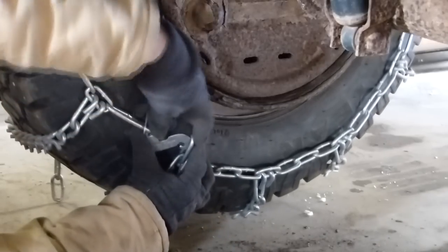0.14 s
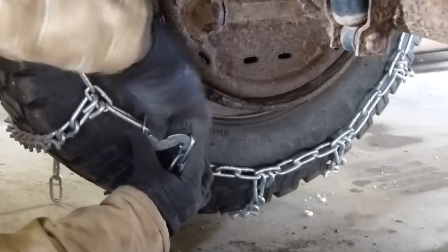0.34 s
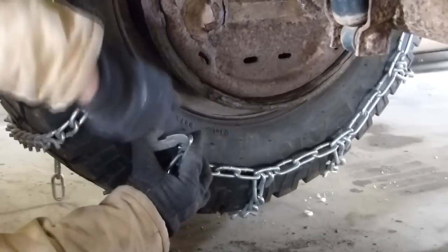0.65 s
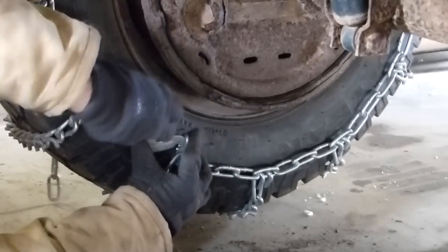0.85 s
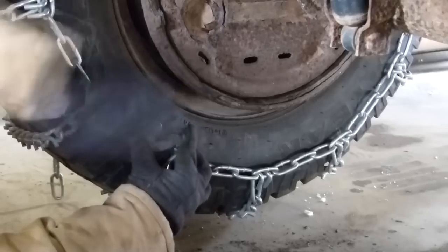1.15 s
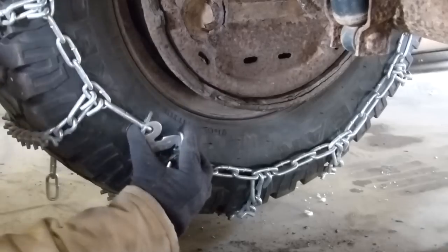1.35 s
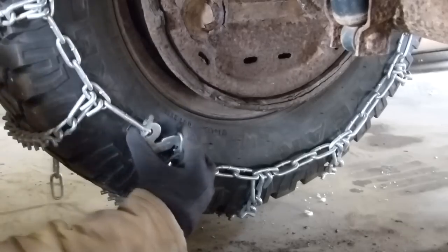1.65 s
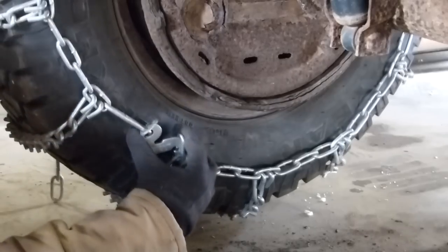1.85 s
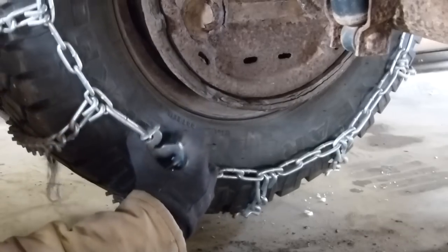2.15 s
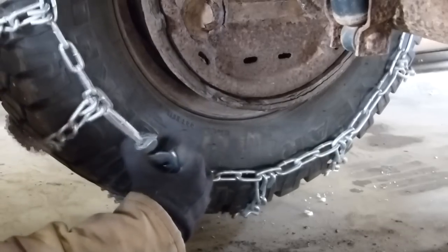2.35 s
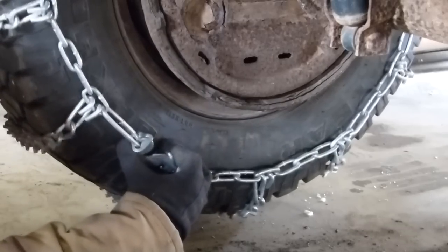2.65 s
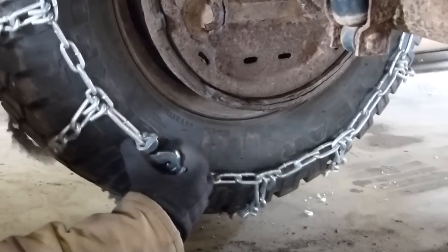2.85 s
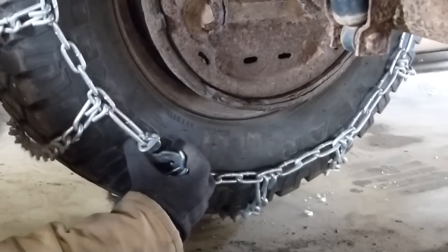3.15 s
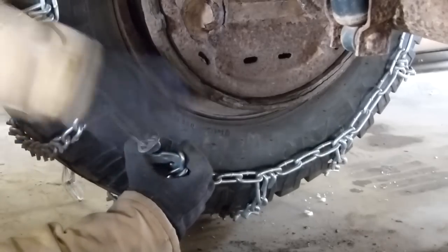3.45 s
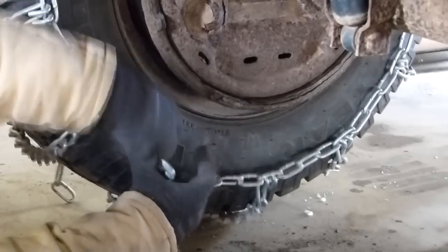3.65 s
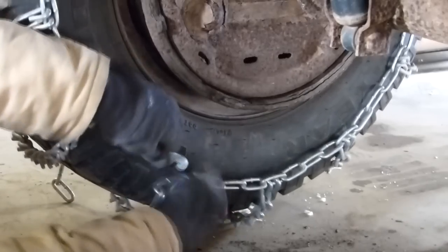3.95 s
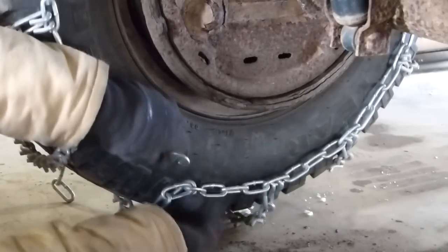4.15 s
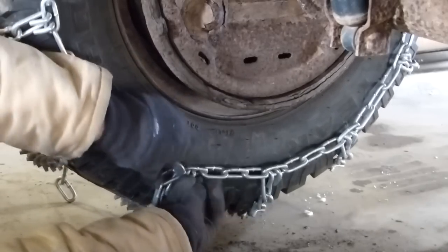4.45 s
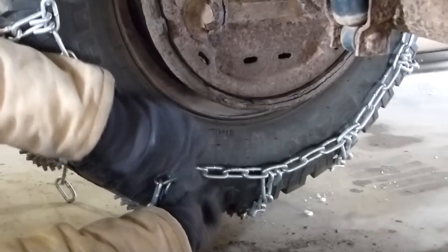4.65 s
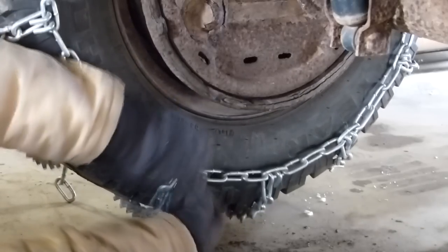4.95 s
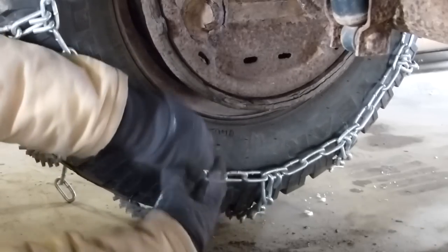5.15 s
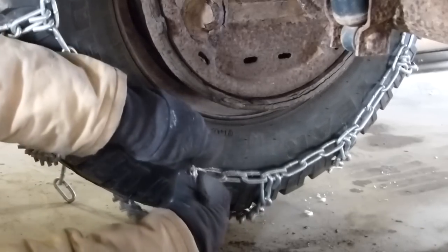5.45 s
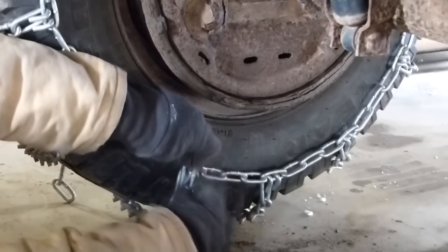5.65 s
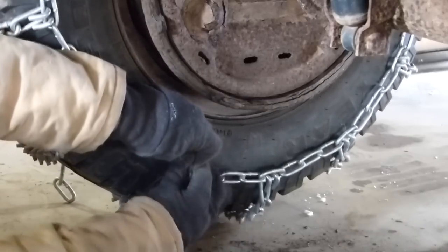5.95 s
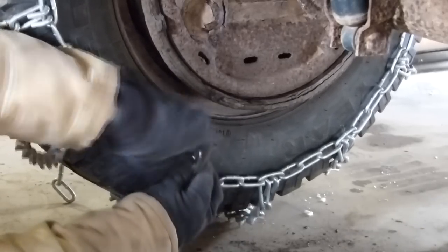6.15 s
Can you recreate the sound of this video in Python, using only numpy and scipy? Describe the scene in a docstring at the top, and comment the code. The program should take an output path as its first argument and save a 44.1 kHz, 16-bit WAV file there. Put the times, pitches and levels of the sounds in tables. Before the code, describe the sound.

Very high, glassy steel chain links clink, chatter and ring in quick clusters, with dull rubber knocks, a short scrape and faint sleeve rustle.

```python
"""Links of a steel snow chain chatter and ring very high as gloved hands hook it around a truck tire.
Each clink is a blow and random contacts driving decaying modes; a heavier, lower hook strikes links too.
Pulled taut and later slack, the chain knocks and slips on the rubber (modes, gliding sines) and scrapes and
rattles over hook and wheel (driven resonances); the rubber rubs with the pull and after each knock.
Sleeves and gloves rustle throughout as filtered contacts and noise, over quiet outdoor air."""
import sys
import numpy as np
from scipy import signal
from scipy.fft import rfft, irfft
from scipy.io import wavfile
from scipy.ndimage import uniform_filter1d

SR = 44100
rng = np.random.default_rng(int(sys.argv[2]) if len(sys.argv) > 2 else 0)


def log_audio(samples):
    """Write samples as a 16-bit WAV file to the path given in sys.argv[1]."""
    # one column per channel
    frames = np.atleast_2d(samples).T
    # limit to full scale, then quantise
    limited = np.clip(frames, -1, 1)
    pcm = np.round(limited * 32767).astype(np.int16)
    wavfile.write(sys.argv[1], SR, pcm)


N = 277830
T = np.arange(N) / SR
TOP_HZ = 16000


def undb(db):
    """Decibels to gain."""
    return 10 ** (np.asarray(db) / 20)


def unit(x):
    """Scale to rms 1."""
    return x / np.sqrt(np.mean(x ** 2) + 1e-24)


def crest(x, size=176):
    """Scale so that the loudest few milliseconds have rms 1."""
    return x / np.sqrt(uniform_filter1d(x ** 2, size).max() + 1e-24)


def add(out, start_s, x):
    """Mix x in at start_s."""
    i = max(int(start_s * SR), 0)
    out[i:i + len(x)] += x[:max(N - i, 0)]


def cut(x, hz, kind, order):
    """Butterworth high-pass or low-pass."""
    return signal.sosfilt(signal.butter(order, hz, kind, fs=SR, output="sos"), x)


def colour(x, points, size=2048):
    """Causal minimum-phase filter with the given spectrum, by folding the cepstrum."""
    hz, db = np.transpose(points)
    f = np.maximum(np.fft.rfftfreq(size, 1 / SR), 1)
    log_gain = np.log(undb(np.interp(np.log(f), np.log(hz), db)))
    cepstrum = irfft(log_gain)
    cepstrum[1:size // 2] *= 2
    cepstrum[size // 2 + 1:] = 0
    response = irfft(np.exp(rfft(cepstrum)))
    return signal.oaconvolve(x, response)[:len(x)]


def ring(x, hz, t60):
    """One decaying mode driven by x: a two-pole resonator."""
    radius = np.exp(-np.log(1000) / (t60 * SR))
    w = 2 * np.pi * hz / SR
    return signal.lfilter([.5, 0, -.5], [1, -2 * radius * np.cos(w), radius * radius], x)


def resonate(x, modes):
    """A body with the given resonances, driven by x."""
    return sum(undb(db) * width_hz * ring(x, hz, np.log(1000) / (np.pi * width_hz))
               for hz, width_hz, db in modes)


def contacts(size, per_s, spread_db):
    """Random tiny impacts of uneven strength and either sign."""
    strength = undb(spread_db * np.minimum(rng.standard_normal(size), 2))
    return (rng.random(size) < per_s / SR) * strength * rng.choice([-1, 1], size)


def strokes(rows):
    """Gain over time of movements that each swell evenly and then die away."""
    gain = np.zeros(N)
    for start_s, db, swell_s, decay_s in rows:
        age = T[:int((swell_s + 12 * decay_s) * SR)]
        rise = np.minimum(age / swell_s, 1)
        fall = np.exp(-np.maximum(age - swell_s, 0) / decay_s)
        add(gain, start_s, undb(db) * rise * fall)
    return gain


def walk(per_s):
    """Smooth random drift with rms 1."""
    k = int(SR / per_s)
    steps = np.repeat(rng.standard_normal(N // k + 1), k)
    return unit(uniform_filter1d(steps, k)[:N])


def glide(hz):
    """Sine that follows a changing pitch."""
    return np.sin(2 * np.pi * np.cumsum(hz) / SR)


def room(x, wet_db, t60, size=22000):
    """Wheel well and floor give a short diffuse tail."""
    t = np.arange(size) / SR
    tail = rng.standard_normal(size) * undb(-60 * t / t60) * (t > .004)
    return x + undb(wet_db) * signal.oaconvolve(x, unit(tail) / np.sqrt(size))[:N]


# Hollow of the wheel. Each row: pitch in Hz, lift in dB.
WHEEL_HOLLOW = [(346, 3), (406, 4), (520, 2.5), (678, 4), (871, 2), (923, 3), (1026, 4), (1116, 6)]
WELL_T60_S = 0.13


def well(x):
    """The hollow of the wheel lifts its own pitches and lets them ring on."""
    norm = 2 * np.log(1000) / (WELL_T60_S * SR)
    return x + sum((undb(db) - 1) * norm * ring(x, hz, WELL_T60_S) for hz, db in WHEEL_HOLLOW)


def ports(x, side_db, top_hz, size=1024):
    """Nearby reflections reach the two microphone ports slightly differently."""
    side = undb(side_db) * signal.oaconvolve(x, rng.standard_normal(size) / np.sqrt(size))[:N]
    side = cut(side, top_hz, "low", order=1)
    return np.array([x + side, x - side])


# Spectrum of outdoor air. Each row: frequency in Hz, relative level in dB.
AIR_SPECTRUM = [(15, -38), (25, -6), (439, -5.5), (659, 0.5), (754, -1.5), (1400, -7.5), (2550, -8.5),
                (3800, -16.5), (8590, -10), (13200, -16.5), (16000, -36)]
AIR_DB, AIR_SIDE_DB = -62, -17


def outdoor_air():
    """Quiet air: coloured noise in the wheel's hollow, with a low-passed difference between the ports."""
    middle, side = (undb(AIR_DB) * unit(well(colour(rng.standard_normal(N), AIR_SPECTRUM)))
                    for _ in range(2))
    side = cut(side, 1500, "low", order=1)
    return middle + undb(AIR_SIDE_DB) * np.array([side, -side])


# Arm movements. Each row: start in seconds, relative level in dB, swell in seconds, decay in seconds.
ARM_REACHES = [(0.35, -62.5, 0.17, 0.22), (1.2, -56.5, 0.32, 0.13), (1.56, -50.5, 0.11, 0.16),
               (1.77, -61.5, 0.096, 0.4), (2.2, -52.5, 0.23, 1), (2.6, -49, 0.099, 0.54),
               (3.0, -34, 0.12, 0.024), (3.69, -49.5, 0.037, 0.025), (3.9, -51.5, 0.22, 0.066),
               (4.32, -46, 0.2, 0.018), (4.98, -41, 0.13, 0.07), (5.8, -51.5, 0.25, 0.06),
               (6.15, -49.5, 0.065, 0.061)]
# Gloves scuffing on the chain. Each row: start in seconds, relative level in dB, body over swish in dB.
GLOVE_SCUFFS = [(0.0346, -60.5, 9.5), (0.175, -55.5, -2), (0.2022, -64.5, 13), (0.6361, -63, 8.5),
                (0.8367, -67, 15), (0.918, -64.5, 9.5), (1.035, -56, -2), (2.141, -40, -30),
                (3.105, -36, -10.5), (3.168, -36.5, -12), (3.707, -42.5, -27), (4.455, -46.5, -32),
                (4.897, -51, -19)]
# Spectra of fibre swish, cloth body, scuff body. Each row: frequency in Hz, relative level in dB.
SWISH_SPECTRUM = [(1200, -5), (2500, -2.5), (4800, 3.5), (7000, -0.5), (9500, 1.5), (12500, -6.5),
                  (16000, -3)]
CLOTH_SPECTRUM = [(100, -27.5), (300, -18), (480, -0.5), (640, 10), (850, -8.5), (1400, 4.5), (2200, -0.5),
                  (4000, -44)]
SCUFF_SPECTRUM = [(300, -26), (700, -8), (900, 0.5), (1300, -6), (3000, -17.5)]
REST_DB = -64.5  # between movements, before swish_db and body_db
FLUTTER_DB, FLUTTER_PER_S = 3.25, 16  # folds of cloth catch unevenly


def cloth(swish_db, body_db, scuff_db, size=5000):
    """Fibres catch and slip as the arms move; the gloves scuff now and then."""
    swish = unit(colour(contacts(N, per_s=7000, spread_db=2.5), SWISH_SPECTRUM))
    body = unit(colour(rng.standard_normal(N), CLOTH_SPECTRUM))
    motion = (undb(REST_DB) + strokes(ARM_REACHES)) * undb(FLUTTER_DB * walk(FLUTTER_PER_S))
    out = motion * (undb(swish_db) * swish + undb(body_db) * body)
    t = np.arange(size) / SR
    envelope = np.minimum(t / 0.0012, 1) * np.exp(-t / 0.023)
    for start_s, db, low_db in GLOVE_SCUFFS:
        slip = contacts(size, per_s=2900, spread_db=2.0) * envelope
        high = crest(colour(slip, SWISH_SPECTRUM))
        low = crest(colour(slip, SCUFF_SPECTRUM))
        add(out, start_s, undb(db + scuff_db) * (high + undb(low_db) * low))
    return out


PULL_S, LET_GO_S, RELAX_S = 1.35, 3.19, 0.0046  # one long pull: start, release, decay of rubbing


def tension(s):
    """Share of the full pull reached by time s; it stays at 1 after LET_GO_S."""
    return np.clip((s - PULL_S) / (LET_GO_S - PULL_S), 0, 1)


# Soft bumps of the tire. Each row: start in seconds, relative level in dB.
TIRE_BUMPS = [(1.799, -51), (2.336, -54), (2.618, -49), (2.877, -46.5)]
# Spectrum of rubbed rubber. Each row: frequency in Hz, relative level in dB.
RUBBER_SPECTRUM = [(70, -19), (160, -2), (270, -3.5), (400, -5), (600, 2), (1030, -10), (2000, -21.5),
                   (4400, -23.5)]
TIRE_AIR_HZ, TIRE_AIR_T60_S = 173, .6
RUB_START_DB, RUB_FULL_DB = -69.5, -38
DRAG_DB, DRAG_SWELL_S, DRAG_DECAY_S = -25.5, 0.012, 0.057  # drag after a knock, relative to its row


def tire(air_db, thud_db, size=30000):
    """Rubber rubs with the pull and after each knock; bumps ring the air inside the tire."""
    held = (T > PULL_S) * np.exp(-np.maximum(T - LET_GO_S, 0) / RELAX_S)
    rub = held * undb(RUB_START_DB + (RUB_FULL_DB - RUB_START_DB) * tension(T))
    rub += strokes([(s, db + DRAG_DB, DRAG_SWELL_S, DRAG_DECAY_S) for s, db, _ in TIRE_KNOCKS])
    out = rub * unit(colour(contacts(N, per_s=900, spread_db=3.0), RUBBER_SPECTRUM))
    t = np.arange(size) / SR
    for start_s, db in TIRE_BUMPS:
        push = rng.standard_normal(size) * t * np.exp(-t / .01)
        air = undb(air_db) * crest(ring(push, TIRE_AIR_HZ, TIRE_AIR_T60_S))
        thud = undb(thud_db) * crest(colour(push, RUBBER_SPECTRUM))
        add(out, start_s, undb(db) * (air + thud))
    return out


# Links slipping over rubber. Each row: start in seconds, relative level in dB, decay in seconds,
# first pitch in Hz.
LINK_SLIPS = [(2.491, -41, 0.0063, 675), (2.621, -25, 0.0033, 666), (2.678, -21, 0.0062, 689),
              (2.880, -20.5, 0.017, 709), (3.117, -19.5, 0.0056, 740), (4.508, -34.5, 0.0026, 790),
              (4.521, -27, 0.0052, 680)]
SLIP_SWELL_S, GRIP_S, GRIP_HZ = 0.004, 0.018, 447  # GRIP_HZ: pitch of a gripping link


def slips(rough, waver_hz):
    """A link jumps over the rubber: a short, rough, hollow grunt whose pitch falls as it grips again."""
    out = np.zeros(N)
    for start_s, db, decay_s, start_hz in LINK_SLIPS:
        fall = np.exp(-np.maximum(T - start_s, 0) / GRIP_S)
        hz = GRIP_HZ + (start_hz - GRIP_HZ) * fall + waver_hz * walk(400)
        gain = strokes([(start_s, db, SLIP_SWELL_S, decay_s)])
        out += gain * (1 + rough * walk(400)) * glide(hz)
    return room(out, wet_db=-12, t60=0.29)


# Chain knocking on the tire. Each row: start in seconds, relative level in dB,
# relative level of the upper modes in dB.
TIRE_KNOCKS = [(2.148, -45, -12), (2.345, -30, -2.5), (2.692, -27.5, -0.5), (2.883, -27, -9),
               (2.935, -21.5, 6), (3.184, -23.5, 11), (3.204, -31.5, 1), (3.79, -50, -1),
               (4.488, -42, -26.5), (4.531, -44, -23), (5.601, -43, -3)]
# Modes of the tire. Each row: nominal pitch in Hz, relative level in dB, t60 in seconds.
TIRE_BODY = [(205, -18, .1), (350, -16, .07), (520, -7, .06), (650, -2, .025), (790, -7, .05),
             (880, -2, .035), (1115, -8, .045), (1335, 0, .028)]


def knocks(gain_db, upper_db, bass_db, push_s, judder_db, size=12000):
    """Rubber cushions each blow; harder ones reach the upper modes, and the chain judders as it settles."""
    out, t = np.zeros(N), np.arange(size) / SR
    cushion = 1 - np.exp(-(t / push_s) ** 2)
    for start_s, db, hard_db in TIRE_KNOCKS:
        force = undb(judder_db) * contacts(size, per_s=520, spread_db=5.0) * np.exp(-t / 0.014)
        force[0] += 1
        body = 0
        for hz, mode_db, t60 in TIRE_BODY:
            level_db = mode_db + (hard_db + upper_db) * (hz > 835) + bass_db * (hz < 400)
            body = body + undb(level_db) * ring(force, hz * (1 + 0.035 * rng.standard_normal()), t60)
        add(out, start_s, undb(db + gain_db) * crest(body * cushion))
    return cut(out, 2350, "low", order=2)


# Chain dragging over hook and wheel. Each row: start in seconds, relative level in dB,
# swell in seconds, decay in seconds.
CHAIN_SCRAPES = [(1.61, -56, 0.06, 0.046), (2.727, -34.5, 0.025, 0.056), (2.983, -21.5, 0.024, 0.045),
                 (4.99, -49, 0.026, 0.097)]
# Resonances of scraped hook and wheel. Each row: pitch in Hz, width in Hz, relative level in dB.
SCRAPE_BODY = [(800, 110, 3), (872, 90, 4), (1115, 200, -3), (1600, 120, 1), (1797, 60, 7), (1935, 90, 0),
               (2304, 130, 2), (2638, 90, 1), (2950, 500, -5)]
SQUEAL_HZ, SQUEAL_SAG_PER_S, SQUEAL_WANDER_HZ = 946, 2.1, 32.7  # first pitch, relative fall, unsteadiness


def scrapes(gain_db, squeal_db, top_hz):
    """Stick-slip of steel on steel rings the hook and wheel; its rubbing pitch sags as each drag slows."""
    body = resonate(contacts(N, per_s=1000, spread_db=2.5), SCRAPE_BODY)
    out = strokes(CHAIN_SCRAPES) * unit(cut(body, top_hz, "low", order=2))
    for row in CHAIN_SCRAPES:
        sag = np.exp(-SQUEAL_SAG_PER_S * np.maximum(T - row[0], 0))
        hz = SQUEAL_HZ * sag + SQUEAL_WANDER_HZ * walk(300)
        out += undb(squeal_db) * strokes([row]) * (1 + .5 * walk(120)) * glide(hz)
    return undb(gain_db) * out


# Links rattling over the hook. Each row: start in seconds, relative level in dB,
# swell in seconds, decay in seconds.
LINK_RATTLES = [(2.732, -37.5, 0.0099, 0.018), (2.998, -36, 0.016, 0.042), (4.995, -43, 0.0072, 0.081),
                (5.08, -40, 0.0063, 0.047)]
# Resonances of the rattling links. Each row: pitch in Hz, width in Hz, relative level in dB.
RATTLE_BODY = [(2165, 25, 0), (3630, 35, 4), (3980, 130, -2), (4810, 90, 1), (5280, 50, 2), (6880, 55, -1)]


def rattles(gain_db):
    """Separate small contacts ring the links as they run over the hook."""
    body = resonate(contacts(N, per_s=220, spread_db=1.0), RATTLE_BODY)
    return undb(gain_db) * strokes(LINK_RATTLES) * unit(body)


# Spectrum of a steel click. Each row: frequency in Hz, relative level in dB.
CRACK_SPECTRUM = [(100, -23), (300, -11.5), (1500, -11), (2800, -12), (4000, -3.5), (6500, -2), (8500, 3),
                  (11000, 1), (16000, -5)]
BITE_S = 0.000824


def crack(force):
    """The click of the contacts; rough steel takes BITE_S to bite and grates for a moment after."""
    t = np.arange(len(force)) / SR
    grating = undb(-20.0) * rng.standard_normal(len(t)) * np.exp(-t / 0.018)
    bite = 1 - np.exp(-t / BITE_S)
    click = bite * cut(colour(force + grating, CRACK_SPECTRUM), 13500, "low", order=2)
    return crest(cut(click, 180, "high", order=2))


# Hook meeting a link. Each row: start in seconds, relative ring level in dB, crack over ring in dB,
# pitch that the struck spot favours in Hz.
HOOK_STRIKES = [(0.074, -48, 0.5, 5400), (2.493, -41, 5, 8300), (3.735, -35.5, -6, 4560),
                (3.787, -36.5, -7, 4540), (5.587, -31.5, -15.5, 8200), (5.709, -23, -11, 8200),
                (6.166, -27.5, -7, 9800), (6.187, -40, -5, 8720), (6.231, -41.5, -8, 4060),
                (6.286, -18, -29, 9540), (6.288, -32.5, -12, 3880)]
# Modes of the hook. Each row: pitch in Hz, relative level in dB, t60 in seconds before limit and scale.
HOOK_BODY = [(3690, -4, .3), (3835, -6, .09), (4230, -7, .4), (5045, -6, .06), (5400, -6, .05),
             (6350, -7, .04), (7350, -9, .14), (8200, 0, .14), (8410, -3, .11), (10290, 1, .17),
             (11600, -6, .11), (14040, -1, .09)]
HOOK_FREE_S, HELD_T60_S = 6.2, 0.12  # the glove holds the hook until then; t60 limit while held, before scale


def hook(focus_octaves, t60_scale, size=16000):
    """The heavier hook rings lower; the spot that is struck decides which modes lead."""
    out, t = np.zeros(N), np.arange(size) / SR
    for start_s, db, click_db, spot_hz in HOOK_STRIKES:
        force = .5 * contacts(size, per_s=1500, spread_db=4) * np.exp(-t / .004)
        force[0] += 1
        tone = 0
        for hz, mode_db, t60 in HOOK_BODY:
            t60 = t60 if start_s > HOOK_FREE_S else min(t60, HELD_T60_S)
            reach = 1 / (1 + (np.log2(hz / spot_hz) / focus_octaves) ** 2)
            # the link that it meets answers briefly, a little off pitch
            link = crest(ring(force, hz * (1 + .015 * rng.standard_normal()), .03))
            tone = tone + undb(mode_db) * reach * (crest(ring(force, hz, t60 * t60_scale)) + link)
        add(out, start_s, undb(db) * (crest(tone) + undb(click_db) * crack(force)))
    return out


BUILD_T60_S = 0.0013


def sing(x, hz, t60):
    """A mode of a link, which takes an instant to build up."""
    return ring(ring(x, hz, t60), hz, BUILD_T60_S)


# Chain swinging, links jingling on. Each row: start in seconds, relative level in dB,
# swell in seconds, decay in seconds.
CHAIN_SWINGS = [(2.94, -22.5, 0.017, 0.11), (3.19, -22.5, 0.1, 0.053), (3.55, -22, 0.025, 0.063),
                (3.85, -22, 0.17, 0.02), (5.0, -23, 0.051, 0.05), (5.79, -14.5, 0.065, 0.036)]
# Modes of taut and slack links. Each row: nominal pitch in Hz, relative level in dB, nominal t60 in seconds.
TAUT_LINK = [(11260, 0, .16), (11350, -2, .08), (12160, -2, .16), (13025, -9, .14)]
SLACK_LINK = [(11250, -5, .24), (11478, 0, .22), (12622, -7, .26), (13712, -14, .24)]
SLACK_S = 3.70
TAUT_SPREAD, SLACK_SPREAD = 0.0041, 0.00082  # relative difference in pitch between links
STIR_DB, STIR_S, SETTLE_S = -21, 0.0219, 0.038  # a clink stirs its neighbours: relative level, swell, decay


def jostle(ring_db, uneven_db, count=3):
    """Swings and clinks keep a few links singing, mode by mode; the pitches change at SLACK_S."""
    slack = np.clip((T - SLACK_S) / .05, 0, 1)
    out = 0
    # links under tension are damped and pulled further apart in pitch
    for modes, share, spread in (TAUT_LINK, 1 - slack, TAUT_SPREAD), (SLACK_LINK, slack, SLACK_SPREAD):
        links = 0
        for hz, db, t60 in modes:
            for offset in np.linspace(-spread, spread, count):
                level = undb(db + uneven_db * walk(25))
                force = contacts(N, per_s=150, spread_db=3.5)
                links = links + level * unit(sing(force, hz * (1 + offset), t60))
        out = out + share * unit(links)
    stirred = [(s, db + STIR_DB, STIR_S, SETTLE_S) for s, db, _, _ in LINK_CLINKS]
    return undb(ring_db) * out * (strokes(CHAIN_SWINGS) + strokes(stirred))


# Links striking each other. Each row: start in seconds, relative level in dB,
# relative crack level in dB (also sets hardness), chatter decay in seconds.
LINK_CLINKS = [(2.059, -25.5, -16.5, 0.031), (2.103, -15, -22, 0.01), (2.168, -23.5, -19, 0.0091),
               (2.248, -23.5, -12, 0.036), (2.271, -13, -20, 0.0044), (2.3066, -16, -17.5, 0.0036),
               (2.338, -6.5, -18, 0.011), (2.4533, -28, -13, 0.0048), (2.507, -11.5, -17, 0.0092),
               (2.612, -23.5, -9, 0.017), (2.689, -16, -8.5, 0.0075), (2.776, -27.5, -21.5, 0.0076),
               (2.8422, -14.5, -18, 0.0046), (2.872, -22, -3, 0.039), (2.935, -11.5, -19.5, 0.011),
               (3.017, -15.5, -15, 0.0025), (3.04, -14.5, -24, 0.0071), (3.081, -12.5, -22, 0.0032),
               (3.187, -7.5, -29, 0.0071), (3.215, -8.5, -29.5, 0.005), (3.235, -12.5, -29, 0.0012),
               (3.251, -12.5, -25, 0.0031), (3.278, -14.5, -22, 0.0047), (3.33, -12, -27.5, 0.0015),
               (3.407, -16, -27.5, 0.0021), (3.426, -20.5, -14.5, .006), (3.495, -23, -25, 0.004),
               (3.53, -13.5, -20.5, 0.011), (3.585, -12, -29, 0.0063), (3.73, -23.5, 4.5, 0.0075),
               (3.735, -17.5, 1.5, 0.0089), (3.769, -10, -20.5, 0.016), (3.788, -5.5, -20, 0.003),
               (3.882, -23.5, -14.5, 0.0036), (3.925, -17, -28, 0.0032), (3.968, -15.5, -27, 0.0099),
               (3.993, -19, -18.5, 0.0081), (4.227, -54, 15.5, 0.011), (4.586, -44, -16, 0.002),
               (4.967, -38, 2, 0.0044), (4.9942, -18, -4.5, 0.007), (5.0811, -15.5, -5.5, 0.012),
               (5.4302, -31.5, -3.5, 0.023), (5.464, -29, -8.5, 0.0044), (5.4746, -11, -28.5, 0.0029),
               (5.5862, -18, -6, 0.0039), (5.71, -12.5, -18, 0.0046), (5.786, -13.5, -20.5, 0.014),
               (5.83, -8, -32, 0.0029), (5.8521, -9, -21, 0.015), (5.9276, -20.5, -17.5, 0.0046),
               (5.996, -30, -8, 0.014)]
CHATTER_PER_S, SLIDE_S = 1700, 0.0092  # contacts within a clink; swell of a soft, sliding one
BLOW = 0.73  # force of the first contact at full hardness
LOOSE_SHARP = 0.013  # relative rise in pitch before the pull presses the link into the rubber
BRIGHTEN_DB = 10  # upper modes of the hardest blow over those of the softest


def clinks(rows, modes, ring_db, crack_db, detune, t60_scale, upper_db, size=20000):
    """A blow and a chatter of contacts ring the link and its neighbour, which is tuned a little apart."""
    out, t = np.zeros(N), np.arange(size) / SR
    for start_s, db, click_db, chatter_s in rows:
        hardness = np.interp(click_db, [-30, 0], [0, 1])
        # soft meetings slide and swell; hard ones start with a blow and reach the upper modes
        envelope = (1 - (1 - hardness) * np.exp(-t / SLIDE_S)) * np.exp(-t / chatter_s)
        force = 0.46 * contacts(size, per_s=CHATTER_PER_S, spread_db=3.5) * envelope
        force[0] += BLOW * hardness
        length = t60_scale * (1 - 0.2 * hardness)  # pinched links ring shorter
        pitch = 1 + LOOSE_SHARP * (1 - tension(start_s))
        tone = 0
        for hz, mode_db, t60 in modes:
            own, other, strike = rng.standard_normal(3)
            spot_db = (upper_db + BRIGHTEN_DB * hardness) * (hz > 11800)
            link = crest(sing(force, hz * (pitch + detune * own / 2), t60 * length))
            neighbour = crest(sing(force, hz * (pitch + 2 * detune * other), t60 * length / 2))
            tone = tone + undb(mode_db + spot_db + 2 * strike) * (link + .5 * neighbour)
        click = undb(click_db + crack_db) * crack(force)
        add(out, start_s, undb(db) * (undb(ring_db) * crest(tone) + click))
    return out


STEEL_SIDE_DB, RUBBER_SIDE_DB = -24, -19.5


def scene():
    """Steel, rubber and cloth over quiet outdoor air; the links are taut at first and slack from SLACK_S on."""
    taut = [row for row in LINK_CLINKS if row[0] < SLACK_S]
    slack = [row for row in LINK_CLINKS if row[0] >= SLACK_S]
    steel = clinks(taut, TAUT_LINK, ring_db=-5.5, crack_db=-5.5, detune=0.0047, t60_scale=0.98, upper_db=-4.5)
    steel += clinks(slack, SLACK_LINK, ring_db=-7.5, crack_db=-8.5, detune=0.0012, t60_scale=0.69,
                    upper_db=-1.0)
    steel += hook(focus_octaves=0.11, t60_scale=0.5)
    steel += jostle(ring_db=-3.5, uneven_db=3.0)
    steel += rattles(gain_db=-4.0)
    dull = knocks(gain_db=-1, upper_db=-3, bass_db=-0.5, push_s=0.0028, judder_db=-16.5)
    dull += tire(air_db=0.5, thud_db=4.0)
    dull += scrapes(gain_db=-3.0, squeal_db=-7.5, top_hz=2610)
    dull += slips(rough=0.19, waver_hz=45.24)
    dull += cloth(swish_db=-4.0, body_db=-8.0, scuff_db=0.5)
    dull = well(cut(dull, 171, "high", order=2))
    steel = ports(room(steel, wet_db=-9.0, t60=0.3), STEEL_SIDE_DB, TOP_HZ)
    dull = ports(room(dull, wet_db=-9, t60=0.12), RUBBER_SIDE_DB, top_hz=1600)
    return steel + dull + outdoor_air()


def record(dry):
    """The microphone softens the highest treble, and the phone cuts the top."""
    soft = cut(dry, 13900, "low", order=5)
    return signal.sosfilt(signal.ellip(8, .2, 70, TOP_HZ, fs=SR, output="sos"), soft)


dry = scene()
out = record(dry)
log_audio(out)
```